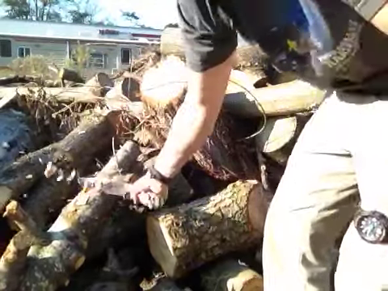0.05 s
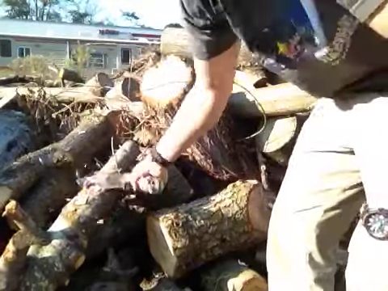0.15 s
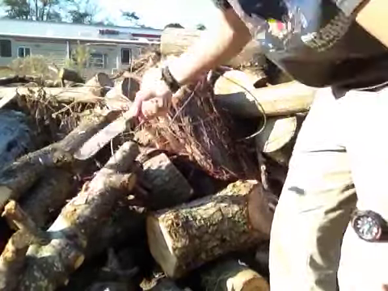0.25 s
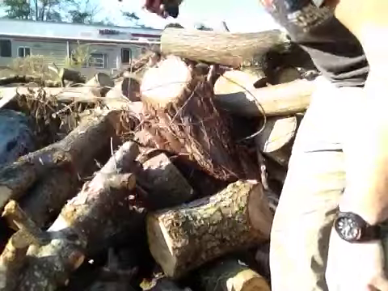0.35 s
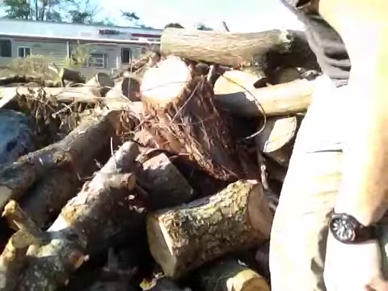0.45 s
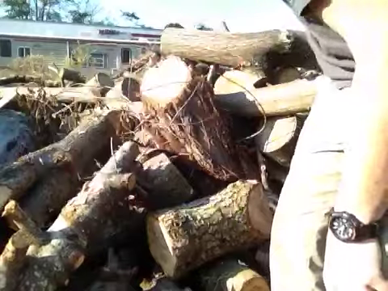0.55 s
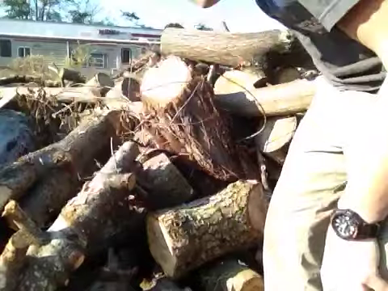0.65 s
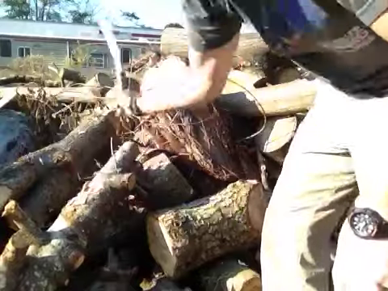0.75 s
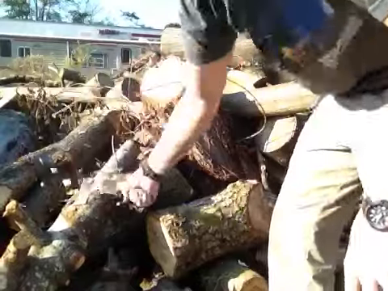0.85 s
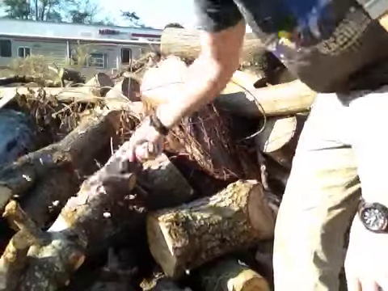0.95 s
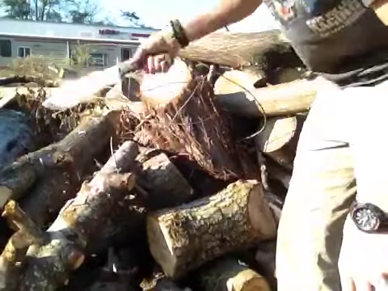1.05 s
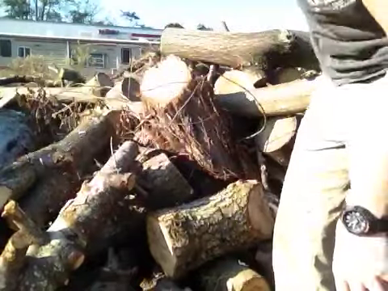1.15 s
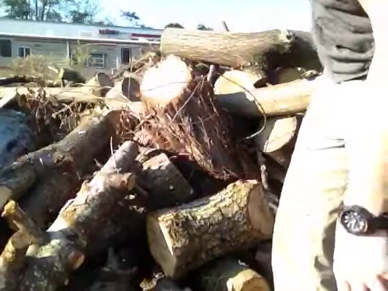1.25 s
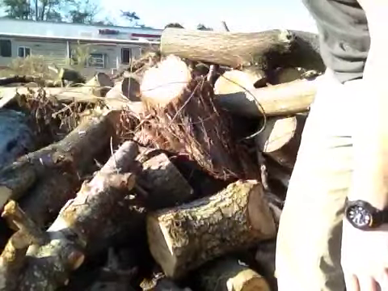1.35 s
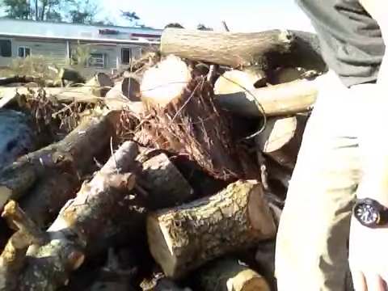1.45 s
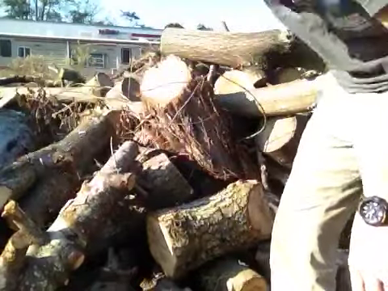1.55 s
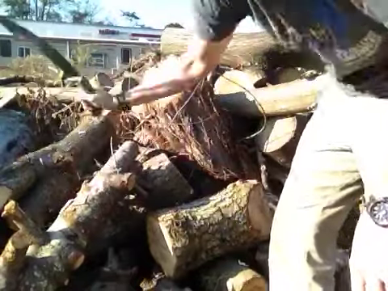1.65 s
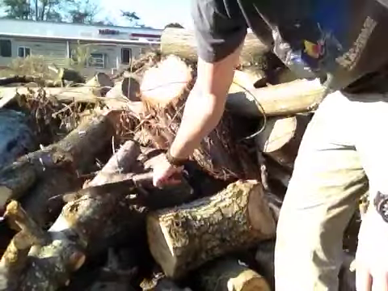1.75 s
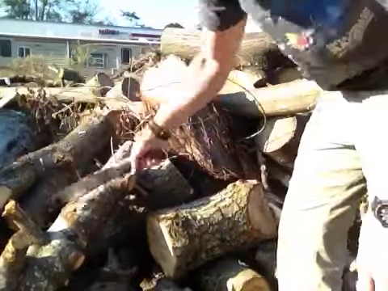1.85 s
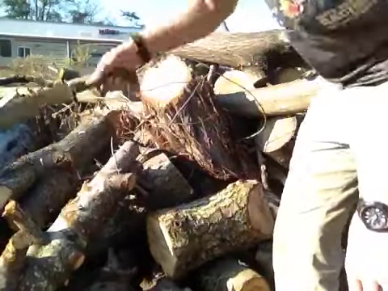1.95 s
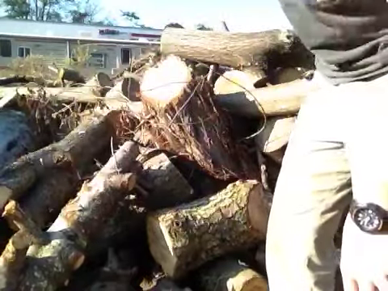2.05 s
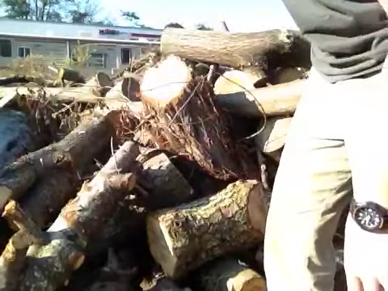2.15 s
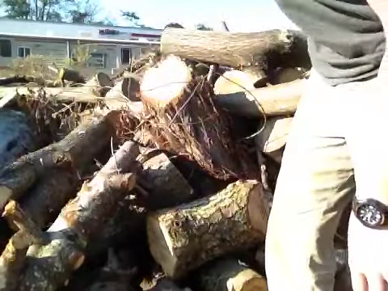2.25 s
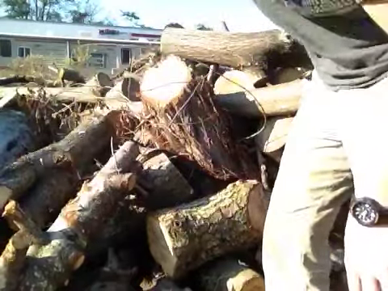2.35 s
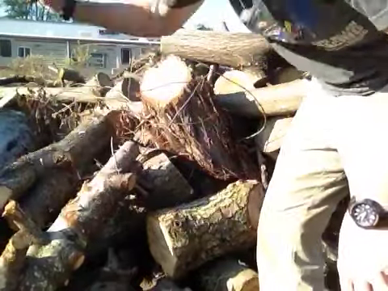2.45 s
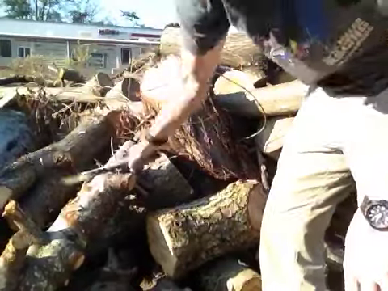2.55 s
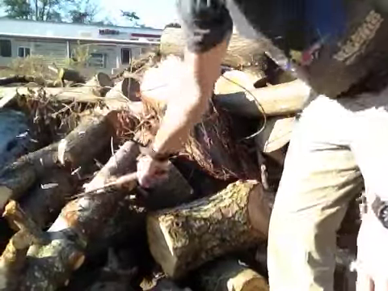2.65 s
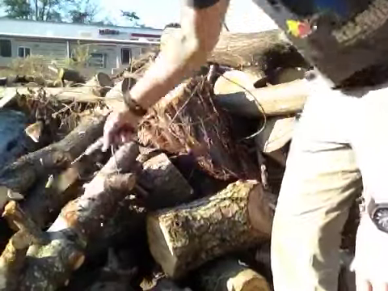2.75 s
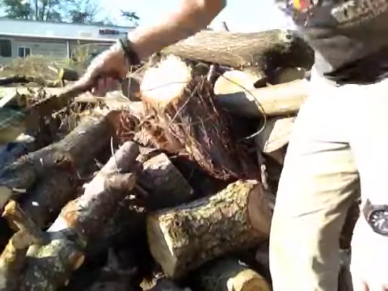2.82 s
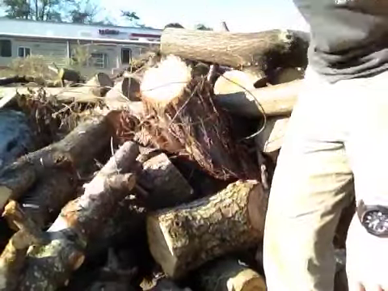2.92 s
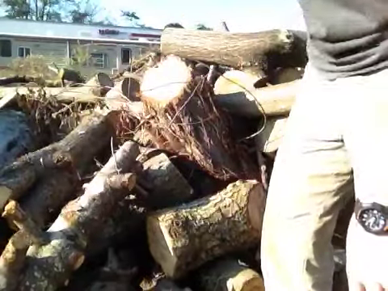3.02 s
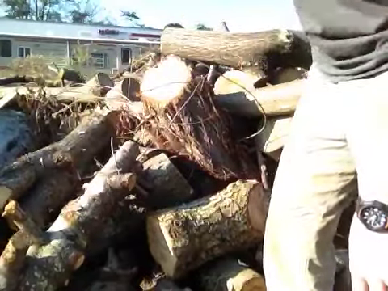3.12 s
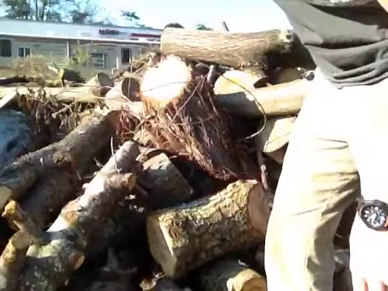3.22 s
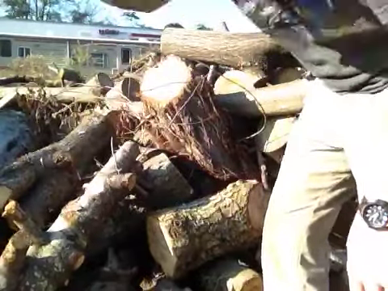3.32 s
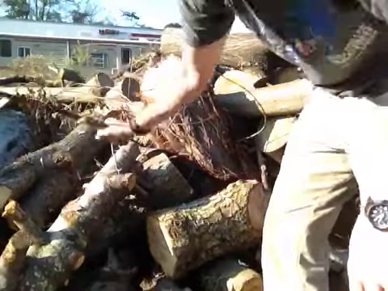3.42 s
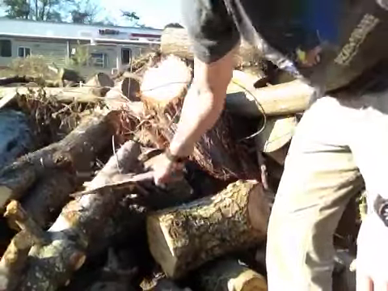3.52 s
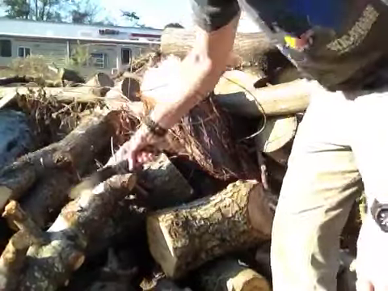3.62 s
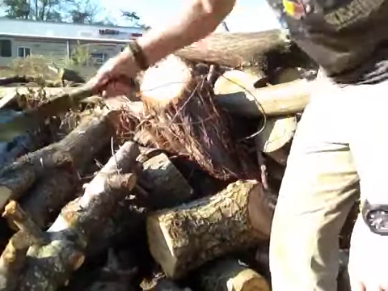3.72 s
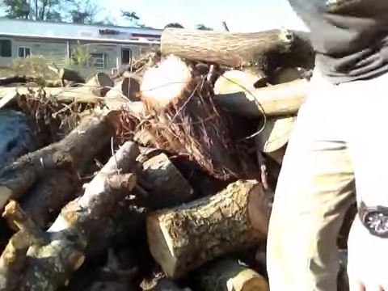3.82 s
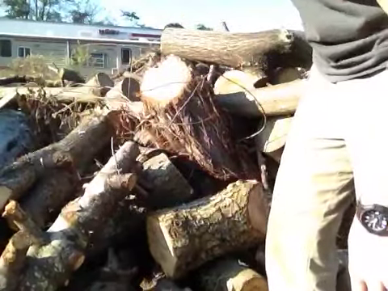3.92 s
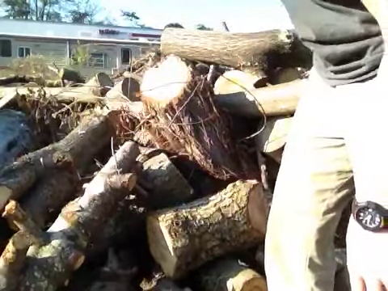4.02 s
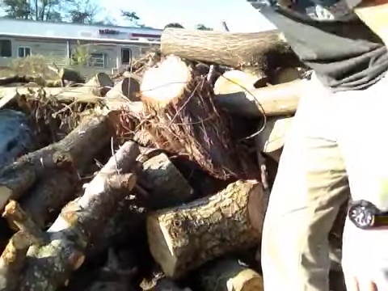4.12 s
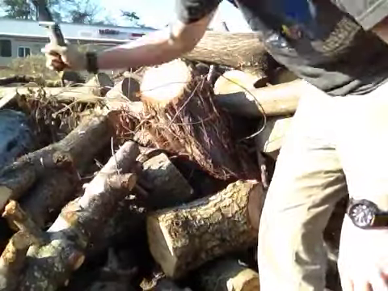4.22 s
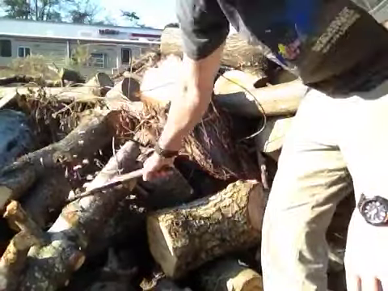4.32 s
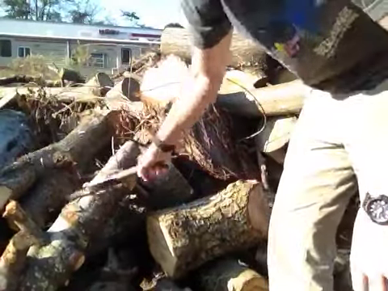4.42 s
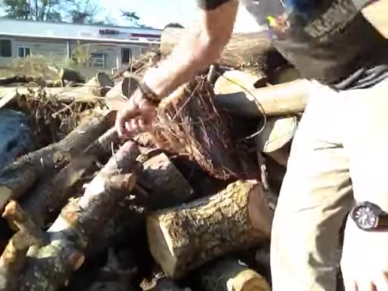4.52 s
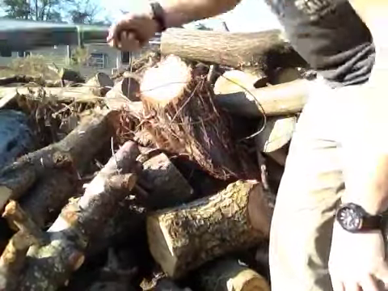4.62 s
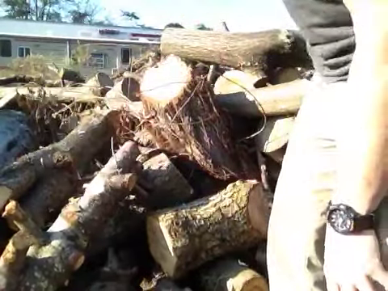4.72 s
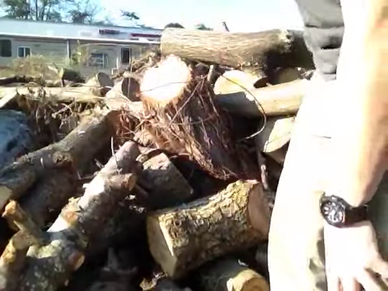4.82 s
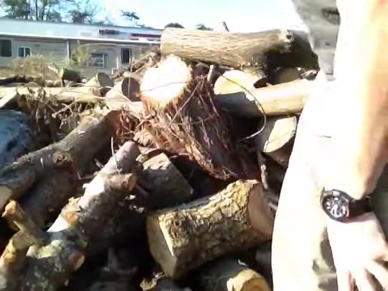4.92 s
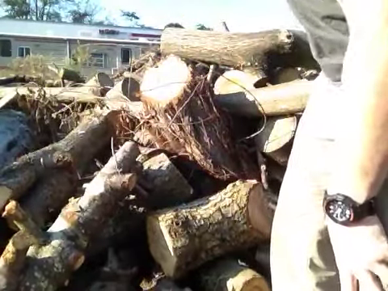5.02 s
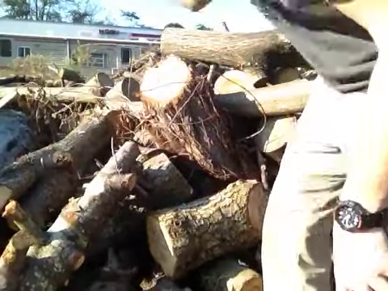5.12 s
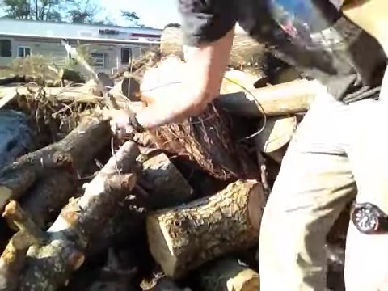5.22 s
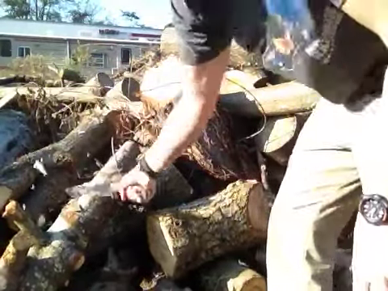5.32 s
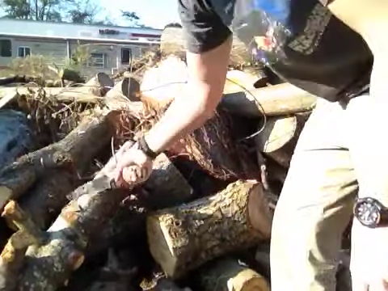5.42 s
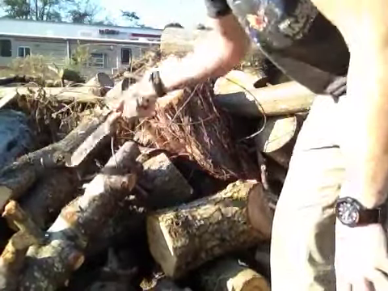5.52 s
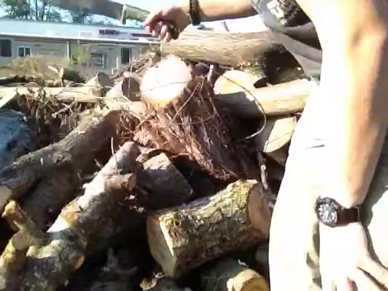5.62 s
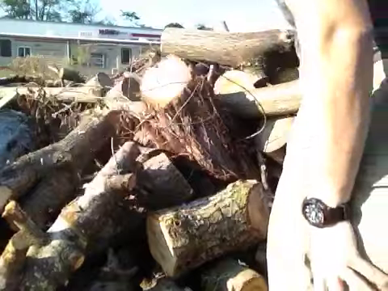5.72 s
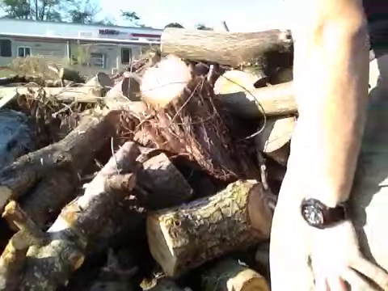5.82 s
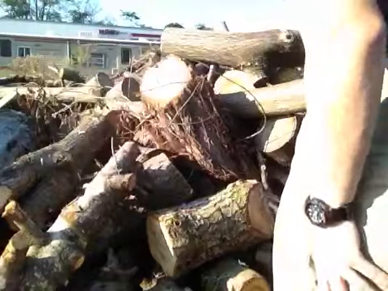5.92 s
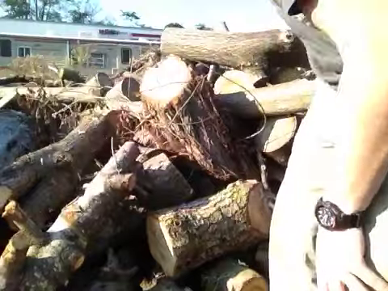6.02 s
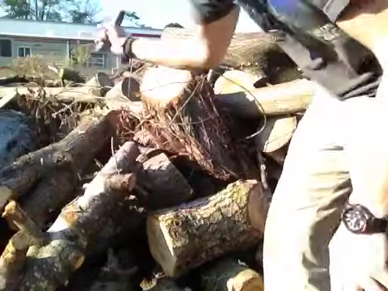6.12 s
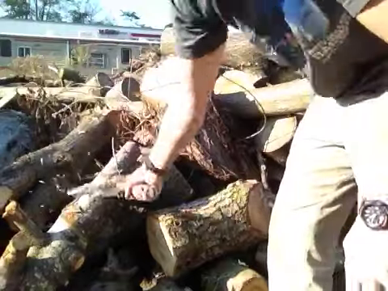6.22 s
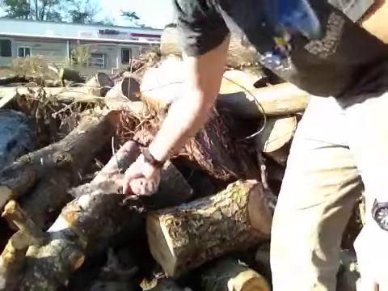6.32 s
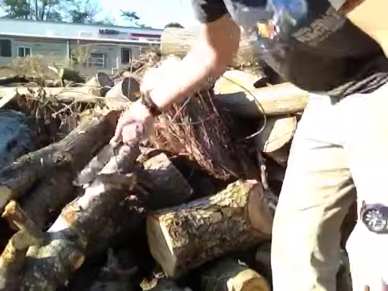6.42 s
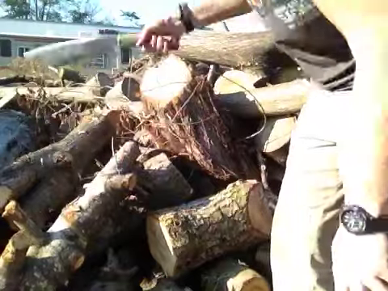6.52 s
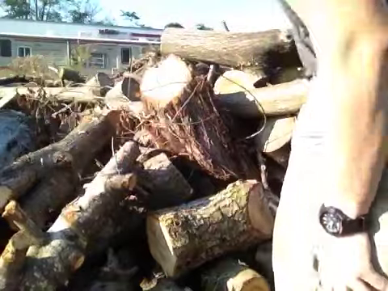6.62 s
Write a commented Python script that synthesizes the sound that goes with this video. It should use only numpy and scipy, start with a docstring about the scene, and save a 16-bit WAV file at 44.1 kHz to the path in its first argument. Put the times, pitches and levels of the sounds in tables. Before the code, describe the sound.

A big knife chops eight times into a log on an outdoor woodpile, sharp woody cracks with chips pattering down and faint yard echo.

```python
"""A quiet yard, one microphone: a big knife chops eight times into a log on a woodpile.
Each blow is a noise burst of crushed fibres, damped modes of log and blade, a thump and a faint late echo.
Chips and bark patter down as short ticks; cloth rustles, scuffs and a swish are shaped noise.
Far off, a bird chirps and a motor hums in gliding sines, over rumble, hiss and a thin electronic whine."""
import sys
import numpy as np
from scipy import signal
from scipy.fft import rfft, irfft, next_fast_len
from scipy.io import wavfile

SR = 44100
rng = np.random.default_rng(int(sys.argv[2]) if len(sys.argv) > 2 else 0)


def generate_wav(sig):
    """Save sig (samples, or channels by samples) to the path in sys.argv[1] as 16-bit PCM at SR."""
    pcm = np.round(np.clip(np.atleast_2d(sig).T, -1, 1) * 32767).astype(np.int16)
    wavfile.write(sys.argv[1], SR, pcm)


N = 294147
T = np.arange(N) / SR
AGE = T[:SR // 2]   # time since an onset, half a second long

# edges of the noise bands [f/Hz]
EDGES_HZ = np.r_[np.geomspace(50, 5600, 15), 6600, 7800, 9000, 10600, 13000, 16000]
# noise bands: (centre f/Hz, width/Hz, filter)
BANDS = [(np.sqrt(lo * hi), hi - lo, signal.butter(2, [lo, hi], "band", fs=SR, output="sos"))
         for lo, hi in zip(EDGES_HZ, EDGES_HZ[1:])]

# the yard's far rumble over time: [t/s, level/dB]
RUMBLE_LEVEL = [(0, -76), (.6, -75), (1.3, -72.5), (4, -77), (4.9, -74), (5.4, -69.5), (6.67, -70)]
# colour of the rumble and stirred air: [f/Hz, relative level/dB]
AIR_COLOUR = [(18, -53), (30, -23.5), (164, -1.5), (327, -5), (404, -6), (572, -6.5), (857, -7.5),
              (1020, -9), (1470, -10), (3000, -15.5), (3900, -46.5), (6600, -120)]
# colour of the steady hiss: [f/Hz, relative level/dB]
HISS_COLOUR = [(400, -18), (1100, -0.5), (2700, -3), (4500, -6.5), (6200, -7), (7700, -5.5), (8700, -14.5),
               (9700, -16.5), (12500, -12), (15000, -10.5)]
# low stir of air that builds up to each blow; rise and fall span 20 dB
WIND_UP_DB, WIND_UP_RISE_S, WIND_UP_FALL_S = -69, 0.66, .2
# swells of a distant drone: [t/s at the height, level/dB, f/Hz, rise and fall/s]
DRONE_SWELLS = [(2.5, -67.5, 168, .5), (5.8, -70, 262.4, 1.2), (6.1, -73, 167.6, 1.8)]
# far bird: [t/s, level/dB, start f/Hz, end f/Hz, length/s]
BIRD_CHIRPS = [(.41, -78.5, 2820, 2640, 0.21), (5.584, -65.5, 3200, 3050, 0.018),
               (5.76, -61, 3400, 2980, 0.016), (5.934, -58, 3500, 2940, 0.022),
               (6.12, -57.5, 3400, 2856, 0.019)]

# clothes rub as the body turns: [t/s at the height, level/dB, fall/s]
CLOTH_RUBS = [(0.62, -78.5, .5), (1.25, -72, 0.9), (2.52, -62.5, 0.13), (3.385, -64, .2), (5.09, -59, .25),
              (5.3, -73, 2.27)]
# colour of rubbing cloth: [f/Hz, relative level/dB]
CLOTH_COLOUR = [(500, -3.5), (1500, -1.5), (4000, -2), (7000, 1.5), (9700, -7), (12500, -1), (15000, -3.5)]
RUSTLE_RISE_S = 0.077
# one fast swing through the air: [t/s at its height, level/dB, rise/s, fall/s]
SWISH_SWELL = (2.598, -48.5, .07, .05)
# colour of the swish: [f/Hz, relative level/dB]
SWISH_COLOUR = [(150, -13.5), (370, -4), (500, -15.5), (700, -7), (800, -4), (970, 2.5), (1100, -10),
                (1270, -7), (1550, -23.5), (4000, -36.5)]
# hollow scuffs: [t/s, level/dB, resonance f/Hz]
SCUFF_EVENTS = [(0.044, -60.5, 1080), (0.347, -70, 1100), (0.826, -63.5, 1140), (1.134, -63.5, 870),
                (2.149, -68, 862), (2.995, -67, 835), (3.91, -66, 954), (4.83, -65, 950), (5.234, -61, 940),
                (6.236, -62.5, 1160), (6.53, -68, 1147)]
# colour of a scuff's grit: [f/Hz, relative level/dB]
SCUFF_COLOUR = [(200, -10), (600, -1), (1200, 1.5), (3500, -4.5), (8000, -19)]

BUMP_S, BUMP_DB, BUMP_HZ = 3.234, -53.5, 160   # a low bump in the pile
# the larger chips landing: [t/s, body level/dB, top level/dB]
LARGE_CHIPS = [(0.507, -78.5, -67.5), (0.654, -68, -64), (1.008, -60.5, -70), (1.032, -50, -48.5),
               (1.227, -68, -65.5), (1.252, -61.5, -61.5), (1.291, -55, -65), (1.382, -83, -59),
               (1.609, -67, -66), (1.881, -58.5, -62.5), (2.35, -66, -67.5), (3.168, -60.5, -64),
               (3.178, -45, -58), (3.232, -57.5, -71), (3.404, -59, -68), (3.422, -62, -65),
               (4.579, -66, -75), (5.692, -59, -62), (5.891, -53, -63), (6.408, -69.5, -51)]
# colour of a chip's woody body: [f/Hz, relative level/dB]
CHIP_BODY_COLOUR = [(150, -9.5), (500, -5), (1300, -0.5), (2600, 0), (4500, -7.5), (8000, -23.5)]
# colour of a chip's bright top: [f/Hz, relative level/dB]
CHIP_TOP_COLOUR = [(2000, -13), (4500, -2), (7200, 6), (9700, -20), (12500, -1.5), (15000, -4)]
# smaller bits at random; the levels are the middle of the spread
STRAY_CHIPS_PER_S, STRAY_BODY_DB, STRAY_TOP_DB, STRAY_SPREAD_DB = 5, -75, -74.5, 4

# blows: [t/s, thump level/dB, thump's lower edge f/Hz, deep ring level/dB, then ring, knock, crack and
# splinter level/dB, blade f/Hz, blade level/dB re the blow's tone there before a 7 dB lift, bite length/s]
BLOWS = [(0.1147, -39.5, 140, -49.5, -30, -23, -21.5, -17.5, 1897, -11, 0.0034),
         (0.892, -39, 150, -42.5, -21, -21, -12, -16, 3220, -10, 0.002),
         (1.7953, -27, 115, -47.5, -20, -23, -14.5, -15, 1499, -13, .0017),
         (2.6471, -41, 130, -48, -25, -29, -15.5, -17.5, 2914, -7.5, 0.0015),
         (3.5453, -40.5, 180, -43.5, -25, -26.5, -16, -18, 2935, -10, .0022),
         (4.3885, -51.5, 174.6, -45, -24.5, -27.5, -21.5, -18, 2900, -14, 0.0017),
         (5.3532, -29, 190, -47.5, -16.5, -18.5, -15, -14, 1684, -12, 0.0026),
         (6.2981, -34.5, 173, -49.5, -21, -24.5, -14, -20, 1756, -5.5, .0024)]
# centres of ring, knock, crack and splinter [f/Hz]
TONE_CENTRES_HZ = [430, 800, 2300, 7000]
# balance of ring, knock, crack and splinter in an ordinary blow [level/dB]
USUAL_BALANCE_DB = [-3, -1.5, -1.5, 1]
# the log's average modes: [f/Hz, level/dB, t60/s]
LOG_MODES = [(349, -10.5, 0.058), (433.6, 1, 0.1), (455, -0.5, 0.13), (475.4, -13, 0.2), (522, -9, 0.08),
             (586, -9.5, 0.034), (651, -10, 0.096), (733.6, -2, .095), (806.3, -7, 0.092), (885, -6, 0.11),
             (1100, -4, 0.054), (1201, -11.5, 0.072), (1457.7, -11, 0.072), (1653, -9, .055),
             (1983, -11.5, 0.054), (2304, -16.5, 0.025)]
# dense, quickly damped ringing of wood and steel: [f/Hz, relative level/dB per Hz, t60/s]
CLATTER_RING = [(100, -28, 0.032), (193, -5.5, 0.08), (424, 2, .06), (809, 5.5, 0.08), (1320, -2.5, 0.069),
                (2900, -5, 0.063), (4600, -7.5, 0.047), (6960, -6, .058), (8200, -12.5, 0.05),
                (9600, -23, 0.06), (12100, -17, 0.05), (15000, -19.5, .055)]
# the edge crushing fibres: [f/Hz, relative level/dB per Hz]
BITE_COLOUR = [(60, -20), (110, -24.5), (200, -9.5), (430, -3), (800, -4.5), (1300, -0.5), (2900, 2),
               (4600, -4.5), (7000, 1.5), (8300, -12), (9700, -21.5), (12500, -8.5), (15000, -11.5)]
# the yard's scattered echo: [f/Hz, relative level/dB per Hz, t60/s]
YARD_ECHO = [(150, -1, 0.22), (330, -3, .35), (460, 5, 0.6), (650, -1, 0.3), (1100, -3, 0.2), (1800, 0, .7),
             (4500, -5, 0.25), (7050, -2, 0.39), (9700, -14.5, .18), (12500, -14.5, 0.23),
             (15000, -22, .15)]
DEEP_HZ, DEEP_T60_S = 195, 0.35   # the log's lowest bending mode
DEBRIS_DB, ECHO_DB = -68, -42.5   # re the force of the blow
CUTOFF_HZ = 15400


def from_db(db):
    """Level in dB to amplitude."""
    return 10 ** (np.asarray(db) / 20)


def rms_one(x):
    """Scale a steady sound to rms 1."""
    return x / np.sqrt(np.mean(x ** 2) + 1e-20)


def unit_burst(x):
    """Scale a burst to the energy of 20 ms at rms 1."""
    return x / np.sqrt(np.sum(x ** 2) / (SR / 50) + 1e-20)


def at_hz(rows, hz, axis=1):
    """Read a table column on a log-frequency axis."""
    rows = np.array(rows)
    return np.interp(np.log(hz), np.log(rows[:, 0]), rows[:, axis])


def add(out, s, sound):
    """Mix a sound in at time s."""
    i = int(np.clip(round(s * SR), 0, N - 1))
    out[i:i + len(sound)] += sound[:N - i]


def drift(rate, t=T):
    """Smooth chance: random knots of spread 1, rate per second, joined by lines."""
    knots = rng.standard_normal(len(t) // 12)
    return np.interp(t * rate, np.arange(len(knots)), knots)


def noise(spectrum):
    """Steady noise of a given colour, rms 1."""
    size = next_fast_len(N)
    hz = np.maximum(np.fft.rfftfreq(size, 1 / SR), 1)
    coloured = rfft(rng.standard_normal(size)) * from_db(at_hz(spectrum, hz))
    return rms_one(irfft(coloured, size)[:N])


def burst(spectrum, envelope):
    """A burst of countless tiny contacts; envelope(Hz) gives its course in each band."""
    out = 0
    for hz, width, sos in BANDS:
        shape = envelope(hz)
        band = signal.sosfilt(sos, shape * rng.standard_normal(len(shape)) + 1e-18)
        out = out + unit_burst(band) * np.sqrt(width) * from_db(at_hz(spectrum, hz))
    return unit_burst(out)


def dying(t60, age=AGE):
    """Fall by 60 dB in t60 seconds."""
    return np.exp(-np.log(1000) * age / t60)


def mode(hz, t60):
    """A struck resonance: a sine that dies away."""
    return np.sin(2 * np.pi * hz * AGE) * dying(t60)


def gliding_sine(pitch):
    """A sine that follows a moving pitch in Hz."""
    return np.sin(2 * np.pi * np.cumsum(pitch) / SR)


def swell(s, db, rise_s, fall_s, order=1):
    """Gain that peaks at time s and is 20 dB down rise_s before and fall_s after; order 2 rounds the top."""
    away = np.maximum((s - T) / rise_s, (T - s) / fall_s)
    return from_db(db - 20 * np.minimum(away, 10) ** order)


def background():
    """Far rumble and the air stirred by each swing, over steady faint hiss."""
    low = signal.sosfilt(signal.butter(2, 900, fs=SR, output="sos"), noise(AIR_COLOUR))
    stir = sum(swell(s, WIND_UP_DB, WIND_UP_RISE_S, WIND_UP_FALL_S) for s, *_ in BLOWS)
    far = from_db(np.interp(T, *np.transpose(RUMBLE_LEVEL)))
    hiss = from_db(-75.5) * noise(HISS_COLOUR)
    return np.hypot(far, stir) * rms_one(low) + hiss


def electronic_whine(centre_hz=7680, sway_hz=140, level_db=-79):
    """A thin, rough whine whose pitch and level throb together, about 15 times a second."""
    sway = np.sin(2 * np.pi * 15 * T + 1.3 * drift(14))
    pitch = centre_hz + sway_hz * sway + 170 * drift(770)
    throb = from_db(3.5 * sway + 2.5 * drift(150))
    return from_db(level_db) * throb * gliding_sine(pitch)


def drone():
    """A far motor hums unsteadily, swelling and fading."""
    out = 0
    for s, db, hz, length_s in DRONE_SWELLS:
        pitch = hz + 5 * drift(25)
        unsteady = from_db(2 * drift(14))
        out = out + swell(s, db, length_s, length_s) * unsteady * gliding_sine(pitch)
    return out


def bird():
    """Far off: short falling chirps and one longer, thin whistle, each a slightly rough gliding sine."""
    out = np.zeros(N)
    for s, db, start_hz, end_hz, length_s in BIRD_CHIRPS:
        progress = np.minimum(AGE / length_s, 1)
        pitch = start_hz + (end_hz - start_hz) * progress + 50 * drift(378, AGE)
        add(out, s, from_db(db) * np.sin(np.pi * progress) * gliding_sine(pitch))
    return out


def swings():
    """Cloth rubs in fine grains, mostly quick to start and slower to fade; one swing flutters through the air."""
    grain = rms_one(from_db(4 * drift(500)))
    rubs = sum(swell(s, db, RUSTLE_RISE_S, fall_s) for s, db, fall_s in CLOTH_RUBS)
    rubbing = rubs * grain * noise(CLOTH_COLOUR)
    flutter = from_db(2 * drift(120))
    return rubbing + swell(*SWISH_SWELL, order=2) * flutter * noise(SWISH_COLOUR)


def scuffs():
    """Brief rubs, each heard both plain and through one hollow resonance."""
    out = np.zeros(N)
    age = AGE[:SR // 10]
    rub = np.tanh(age / 0.0011) * dying(.08, age)
    for s, db, pitch in SCUFF_EVENTS:
        grit = burst(SCUFF_COLOUR, lambda hz: rub)
        hollow = unit_burst(signal.lfilter(*signal.iirpeak(pitch, 6, fs=SR), grit))
        add(out, s, from_db(db) * (hollow + grit))
    return out


def bump():
    """Loose wood settles with one dull knock of two damped modes."""
    out = np.zeros(N)
    knock = mode(BUMP_HZ, .22) + 0.78 * mode(BUMP_HZ * 2.9, .08)
    add(out, BUMP_S, from_db(BUMP_DB) * np.tanh(AGE / .003) * knock)
    return out


def stray_chips():
    """Small bits of bark drop now and then: rows of t/s, body level/dB, top level/dB."""
    slots = np.arange(0, N / SR, .02)
    falls = rng.random(len(slots)) < STRAY_CHIPS_PER_S * slots[1]
    spread = STRAY_SPREAD_DB * rng.standard_normal((len(slots), 2))
    levels = [STRAY_BODY_DB, STRAY_TOP_DB] + spread
    return np.column_stack([slots, levels])[falls]


def chips(colour_db=3.5):
    """Each chip has its own colour and lands with a sharp tick and a short, uneven woody rattle."""
    out, age = np.zeros(N), AGE[:SR // 10]

    def own_colour(spectrum):
        return [(hz, at_hz(spectrum, hz) + colour_db * rng.normal()) for hz, *_ in BANDS]

    snap = dying(0.017, age)
    for s, body_db, top_db in [*LARGE_CHIPS, *stray_chips()]:
        rattle = from_db(2.8 * drift(560, age))
        body = snap + .5 * rattle * dying(0.07, age)
        top = snap + 0.59 * rattle * dying(0.059, age)
        add(out, s, from_db(body_db) * burst(own_colour(CHIP_BODY_COLOUR), lambda hz: body))
        add(out, s, from_db(top_db) * burst(own_colour(CHIP_TOP_COLOUR), lambda hz: top))
    return out


def debris(per_s=90, spread_db=3):
    """Crumbs of bark patter down as tiny ticks, thinning out after the blow."""
    falls = rng.random(len(AGE)) < per_s * np.tanh(AGE / .05) * dying(.7) / SR
    sizes = from_db(spread_db * np.minimum(rng.exponential(1, len(AGE)), 3))
    tick = burst(CHIP_TOP_COLOUR, lambda hz: dying(0.009, AGE[:SR // 50]))
    return signal.fftconvolve(falls * sizes, tick)


def yard_echo(delay_s=.085, near_db=-2):
    """The woodpile scatters a little at once; buildings and trees answer later, in uneven clumps."""
    near = from_db(near_db) * np.tanh(AGE / 0.026)
    arrival = .5 + .5 * np.tanh((AGE - delay_s) / .013)
    clumps = from_db(2 * drift(120, AGE))
    paths = clumps * (near + from_db(10.0) * arrival)
    return burst(YARD_ECHO, lambda hz: paths * dying(at_hz(YARD_ECHO, hz, axis=2)))


def thump(low_hz, high_hz=275):
    """The whole log is pushed into the pile and stops almost at once: a band-passed impulse."""
    push = 1. * (AGE == 0) + 1e-18
    band = signal.butter(3, [low_hz, high_hz], "band", fs=SR, output="sos")
    return unit_burst(signal.sosfilt(band, push))


def chop(tone_db, force_db, blade_hz, blade_db, bite_s):
    """The edge bites for a few ms; wood and blade ring on; where it lands sets the tone."""
    tone = list(zip(TONE_CENTRES_HZ, tone_db))
    usual = list(zip(TONE_CENTRES_HZ, USUAL_BALANCE_DB))

    def tinted(rows):
        return [(row[0], row[1] + at_hz(tone, row[0]) - at_hz(usual, row[0])) for row in rows]

    # fibres give way in a few uneven jerks
    jerks = np.tanh(AGE / .0003) * from_db(2.6 * drift(3000, AGE))
    crush = jerks * np.exp(-np.minimum(AGE / bite_s, 20) ** 2)
    bite = from_db(force_db - 9.5) * burst(tinted(BITE_COLOUR), lambda hz: crush)

    onset = 1 - np.exp(-AGE / 0.0011)
    ringing = burst(tinted(CLATTER_RING), lambda hz: onset * dying(at_hz(CLATTER_RING, hz, axis=2)))
    clatter = from_db(force_db - 12.5) * ringing

    log = 0
    for k, (hz, db, t60) in enumerate(LOG_MODES):
        # the embedded blade shifts and damps each mode differently on every blow
        pitch = hz * (1 + .005 * rng.normal())
        damping, strength = from_db(.7 * rng.standard_normal(2))
        level = strength * from_db(db + at_hz(tone, hz))
        log = log + (-1) ** k * level * mode(pitch, t60 * damping)

    blade_modes = mode(blade_hz, .045) - mode(blade_hz * 0.93, 0.048)
    blade = from_db(blade_db + at_hz(tone, blade_hz)) * blade_modes
    return bite + clatter + onset * (from_db(0.5) * log + from_db(7) * blade)


def chopping():
    """Every blow; its force, the summed power of its four tones, sets the debris and the echo."""
    out = np.zeros(N)
    for s, thump_db, thump_hz, deep_db, *tone_db, blade_hz, blade_db, bite_s in BLOWS:
        force_db = 10 * np.log10(np.sum(from_db(tone_db) ** 2))
        deep_ring = np.tanh(AGE / 0.014) * mode(DEEP_HZ, DEEP_T60_S)
        add(out, s, chop(tone_db, force_db, blade_hz, blade_db, bite_s))
        add(out, s, from_db(thump_db) * thump(thump_hz))
        add(out, s, from_db(deep_db) * deep_ring)
        add(out, s, from_db(force_db + DEBRIS_DB) * debris())
        add(out, s, from_db(force_db + ECHO_DB) * yard_echo())
    return out


def scene():
    """All sources at one microphone."""
    yard = background() + drone() + bird()
    wood = bump() + chips() + chopping()
    return (yard + electronic_whine() + swings() + scuffs() + wood)[None]


def record(dry, top=0.66, bass_cut_hz=70):
    """The small microphone loses the bass, the loudest peaks overload softly and the top is cut."""
    thin = signal.sosfilt(signal.butter(2, bass_cut_hz, "high", fs=SR, output="sos"), dry)
    clipped = thin / (1 + (thin / top) ** 4) ** .25
    return signal.sosfilt(signal.ellip(10, .2, 70, CUTOFF_HZ, fs=SR, output="sos"), clipped)


dry = scene()
out = record(dry)
generate_wav(out)
```